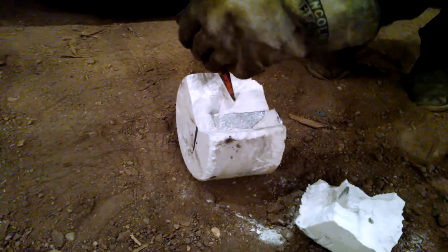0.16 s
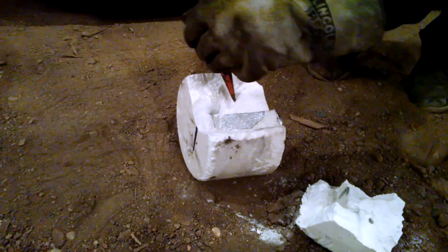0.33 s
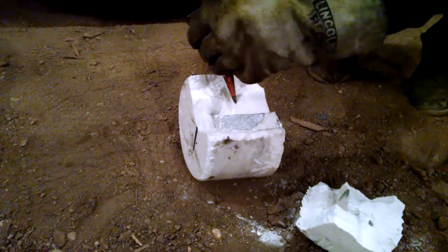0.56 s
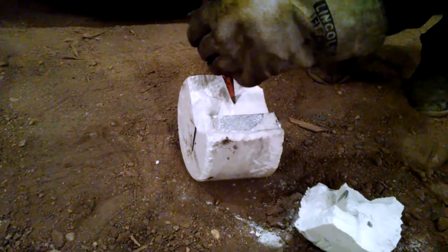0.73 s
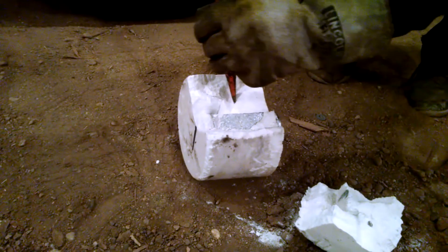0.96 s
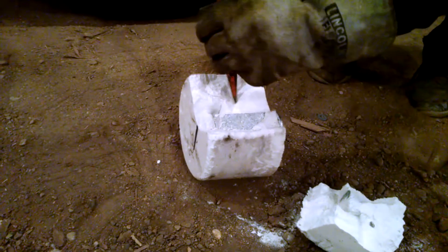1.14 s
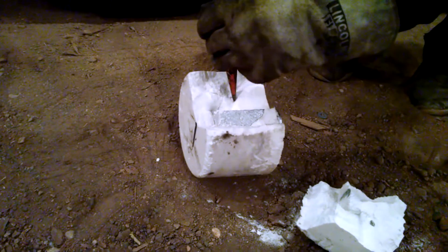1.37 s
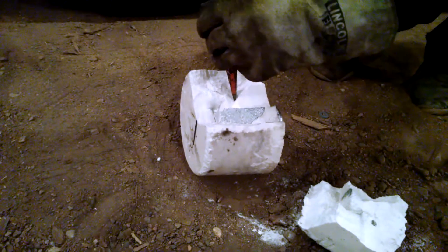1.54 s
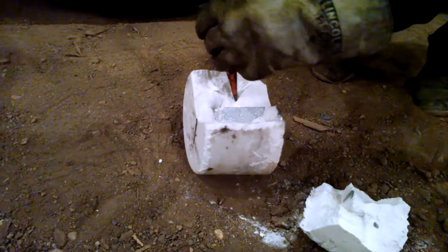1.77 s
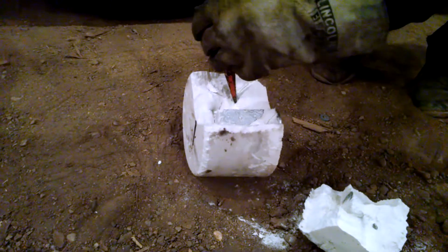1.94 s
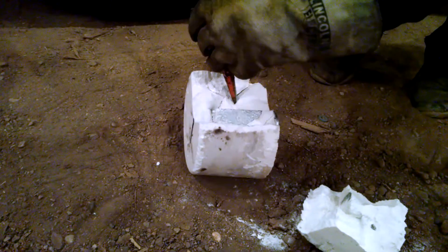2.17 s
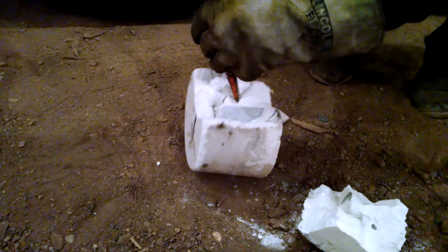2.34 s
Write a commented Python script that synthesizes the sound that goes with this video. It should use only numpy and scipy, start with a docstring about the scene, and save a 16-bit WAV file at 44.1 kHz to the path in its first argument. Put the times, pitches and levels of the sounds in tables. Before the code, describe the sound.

Hammer blows on a steel chisel crack a plaster mould, bright metallic clanks echoing in a hard room

```python
"""In a hard-walled room a hammer drives a steel chisel into a plaster mould around a metal casting.
Seven blows fall, about three a second: noise bursts crack the plaster, damped sines make chisel, mould and casting.
As the plaster loosens, the casting clanks more; some blows leave thin tones in the steel.
Floor and walls answer each blow, low pushes overload the close microphone, and one chip lands at the end.
Faint steady noise lies beneath."""
import sys
import numpy as np
from scipy import signal
from scipy.fft import rfft, irfft, next_fast_len
from scipy.io import wavfile

SR = 44100
rng = np.random.default_rng(int(sys.argv[2]) if len(sys.argv) > 2 else 0)


def store_pcm(level_fs):
    """Save levels as 16-bit WAV."""
    pcm = np.round(np.clip(level_fs, -1, 1) * 32767).astype(np.int16)
    wavfile.write(sys.argv[1], SR, np.atleast_2d(pcm).T)


N = 105840
T = np.arange(SR // 6) / SR  # s within one blow


def amp(db):
    """Amplitude factor of a level in dB."""
    return 10 ** (np.asarray(db) / 20)


def unit(x):
    """Scale to an RMS of one."""
    return x / np.sqrt(np.mean(x ** 2) + 1e-20)


def along(points, hz):
    """Interpolate (Hz, value) points on a log frequency axis."""
    f, v = np.transpose(points)
    return np.interp(np.log(hz + 1), np.log(f + 1), v)


def tilted(points, hz, tilt_db_per_octave):
    """Gain of a dB spectrum tipped about 2.9 kHz, less steeply in the bass."""
    return amp(along(points, hz) + tilt_db_per_octave * np.log2((hz + 100) / 3000))


def fade(t, t60):
    """Exponential decay, 60 dB in t60 seconds."""
    return amp(-60 * t / t60)


def add(out, s, x):
    """Mix x into out from s seconds on."""
    part = out[..., round(s * SR):][..., :x.shape[-1]]
    part += x[..., :part.shape[-1]]


def filtered(x, response):
    """Multiply the spectrum of x by a complex response of frequency."""
    n = x.shape[-1]
    m = next_fast_len(n + 1024, True)
    return irfft(rfft(x, m) * response(np.fft.rfftfreq(m, 1 / SR)), m)[..., :n]


CONTACT_S = 0.00056  # rise time constant


def ring(t, modes):
    """Damped sines (Hz, dB, T60 in s) that rise over the contact."""
    sines = sum(amp(db) * fade(t, t60) * np.sin(2 * np.pi * hz * t) for hz, db, t60 in modes)
    return (1 - np.exp(-t / CONTACT_S)) * sines


# Left-right likeness of sound from all sides. Each row: frequency in Hz, correlation from -1 to 1.
ROOM_LIKENESS = [(100, -0.7), (600, 0.81), (1500, 0.6), (3600, 0.11), (5100, -0.12), (7000, 0.016),
                 (10000, -.1)]


def diffuse(size):
    """Sound from all sides: noise whose mid and side shares set the left-right likeness."""
    def mid_side_gains(hz):
        angle = np.arccos(np.clip(along(ROOM_LIKENESS, hz), -1, 1)) / 2
        return np.array([np.cos(angle), np.sin(angle)])

    mid, side = filtered(rng.standard_normal((2, size)), mid_side_gains)
    return np.array([mid + side, mid - side])


BACKGROUND_DB = -65.5
# Steady background noise as picked up, with a dip near 2.5 kHz.
# Each row: frequency in Hz, relative density in dB per Hz.
BACKGROUND_SPECTRUM = [(25, -8), (65, -3), (110, -3.5), (200, -11.5), (600, -11), (1900, -14), (2550, -30),
                       (3100, -15), (3700, -10.5), (5000, -19), (9000, -20.5), (15000, -24)]


def background():
    """Steady diffuse noise, coloured by the background spectrum."""
    noise = filtered(diffuse(N), lambda hz: amp(along(BACKGROUND_SPECTRUM, hz)))
    return amp(BACKGROUND_DB) * unit(noise)


ROOM_RISE_S = 0.005
ROOM_UNEVEN_DB = 2.5  # the room favours some frequencies by chance
WALL_S, WALL_DB, WALL_T60_S = 0.032, -3, 0.062  # nearest wall, level over the reverberation
# Reverberation time. Each row: frequency in Hz, T60 in seconds.
ROOM_T60_S = [(150, 0.27), (500, 1.3), (1800, 1.4), (3600, 1.04), (7000, 0.67), (11000, .45), (15000, .35)]


def room(colour):
    """Answer to a burst of this colour: diffuse noise swells at a near wall and decays at each band's T60."""
    hz, t, z = signal.stft(diffuse(SR), SR, nperseg=512)
    decay = fade(t, along(ROOM_T60_S, hz)[:, None]) * (1 - np.exp(-t / ROOM_RISE_S))
    decay += amp(WALL_DB) * fade(np.abs(t - WALL_S), WALL_T60_S)
    uneven = amp(ROOM_UNEVEN_DB * rng.standard_normal(len(hz)))
    even_energy = np.sqrt(SR * np.mean(decay ** 2, axis=1, keepdims=True))
    decay *= (uneven * colour(hz))[:, None] / even_energy
    return signal.istft(z * decay, SR, nperseg=512)[1]


FLOOR_S, FLOOR_GAIN = 0.00355, 0.23
# Phase between the two microphone ports. Each row: frequency in Hz, left lead in radians.
PORT_LEAD_RAD = [(300, 0), (1000, -.45), (2000, -.6), (3800, -.8), (5100, -2.7), (6900, -5.4),
                 (11000, -8.4), (15000, -11)]


def port_phase(hz):
    """Split the phase lead evenly between the left and right ports."""
    return np.exp(1j * np.outer([.5, -.5], along(PORT_LEAD_RAD, hz)))


def arrive(x):
    """Direct sound and a delayed floor reflection at the two microphone ports."""
    def floor(hz):
        return 1 + FLOOR_GAIN * np.exp(-2j * np.pi * hz * FLOOR_S)

    return filtered(x, lambda hz: floor(hz) * port_phase(hz))


CHIP_S, CHIP_HZ, CHIP_DB, CHIP_T60_S = 2.291, 535, -40, 0.042


def chip():
    """A loose piece of plaster drops on the earth with a dull tap: one damped sine."""
    out = np.zeros(N)
    add(out, CHIP_S, ring(T, [(CHIP_HZ, CHIP_DB, CHIP_T60_S)]))
    return out


THUMP_PEAK_S, THUMP_LAG_S = 0.002, 0.00015  # left lags right
THUMP_SAG, THUMP_SAG_S = 0.046, 0.033  # opposite offset, slow recovery
# Microphone overloads. Each row: start in seconds, level in dB, swing in Hz.
OVERLOAD_PUSHES = [(0.233, -15.5, 45), (0.5614, -15, 40), (1.5072, -6.5, 190), (1.8138, -18.5, 29.85),
                   (2.1073, -10, 45)]


def thumps():
    """Hard blows overload the microphone: one low push and sag, nearly opposite in the two channels."""
    out, u = np.zeros((2, N)), T / THUMP_PEAK_S
    sag = THUMP_SAG * (1 - np.exp(-u)) * np.exp(-T / THUMP_SAG_S)
    for s, db, swing_hz in OVERLOAD_PUSHES:
        swing = np.cos(2 * np.pi * swing_hz * (T - THUMP_PEAK_S / 2))
        push = amp(db) * ((u * np.exp(1 - u)) ** 2 * swing - sag)
        add(out[0], s + THUMP_LAG_S, -push)
        add(out[1], s, push)
    return out


WAVER_DB, WAVER_PER_S = 3, 70  # standard deviation, knots per second
# Steel left ringing by a blow. Each row: start in seconds, frequency in Hz, level in dB, T60 in seconds.
STEEL_RINGS = [(0.2320, 6664, -33, 0.49), (0.2320, 3768, -39, 0.67), (0.231, 3810, -35.5, 0.6),
               (0.2320, 6690, -34.5, 0.38), (0.231, 11230, -41.5, .25), (0.5625, 11300, -42, .25),
               (0.9458, 3906, -53, 0.66), (0.5614, 6330, -65, .6), (1.2220, 3360, -42.5, 0.58),
               (1.8125, 3360, -43, 0.54), (1.223, 7103, -53, 0.39), (1.5077, 6290, -33.5, 0.63),
               (1.5084, 7150, -38.5, 0.43), (1.814, 7103, -30, 0.37), (1.8127, 6310, -38.5, 0.41),
               (1.8138, 11262, -11.5, .05), (1.8134, 11280, -39.5, 0.32), (2.11, 7103, -30.5, 0.43)]


def steel():
    """Thin, long damped sines in the metal, whose levels waver per channel in the room's echoes."""
    out, t = np.zeros((2, N)), np.arange(SR * 2 // 3) / SR
    for s, hz, db, t60 in STEEL_RINGS:
        knots = rng.standard_normal((2, 64))
        waver_db = [WAVER_DB * np.interp(t * WAVER_PER_S, np.arange(64), k) for k in knots]
        add(out, s, ring(t, [(hz, db, t60)]) * amp(waver_db))
    return filtered(out, port_phase)


# Plaster body. Each row: multiple of the knock pitch, relative level in dB, T60 in seconds.
MOULD_MODES = [(0.351, -12.5, 0.018), (1, -0.5, .010)]


def mould(knock_hz, knock_db):
    """The plaster body knocks: short damped sines at multiples of the knock pitch."""
    return ring(T, [(k * knock_hz, db + knock_db, t60) for k, db, t60 in MOULD_MODES])


# Casting, damped by its plaster jacket. Each row: frequency in Hz, relative level in dB, T60 in seconds.
CASTING_MODES = [(3095, -15.5, .035), (3366, -14.5, .04), (3827, -19.5, .03), (4228, -8.5, 0.034),
                 (4910, -6, 0.021), (5020, -5.5, 0.05), (6324, -9.5, .04), (7385, -17.5, 0.039),
                 (7450, -6.5, 0.037), (11250, -28.5, .04), (14000, -26.5, .02)]


def casting(clank_db, tilt_db_per_octave, pivot_hz):
    """The metal clanks: fixed damped modes, tipped about the chisel pitch."""
    modes = [(f, db + clank_db + tilt_db_per_octave * np.log2(f / pivot_hz), t60)
             for f, db, t60 in CASTING_MODES]
    return ring(T, modes)


CHISEL_T60_S = 0.026  # the gloved hand damps it
# Chisel overtones. Each row: frequency in Hz, relative level in dB, T60 in seconds.
CHISEL_OVERTONES = [(3684, -14, .04), (6722, -11.5, 0.039), (10250, -18.5, 0.028), (11230, -23.5, 0.041),
                    (15600, -24.5, .025)]


def chisel(hz, clack_db, overtones_db):
    """The struck steel clacks: a damped sine at its pitch plus fixed overtones."""
    return ring(T, [(hz, clack_db, CHISEL_T60_S)]) + amp(overtones_db) * ring(T, CHISEL_OVERTONES)


CRACK_T60_S, SCATTER_DB = 0.031, -7  # scatter: share of the crack arriving from all sides
CRUMBLE_DB, CRUMBLE_T60_S, CRUMBS_PER_S = -22.5, 0.11, 1500  # dust and crumbs
# Breaking plaster as picked up. Each row: frequency in Hz, relative density in dB per Hz.
CRACK_SPECTRUM = [(100, -15), (300, -9), (520, 1.5), (780, -4), (1150, -0.5), (1900, 3.5), (2550, -13),
                  (3200, 7), (4200, 6), (5600, -3.5), (7400, -5), (8700, -18), (11000, -3.5), (13500, -27),
                  (15000, -11.5), (16500, -26)]


def plaster(tilt_db_per_octave):
    """Breaking plaster: a noise burst with a faint spray of random impulses, both in the crack's colour."""
    def colour(hz):
        return tilted(CRACK_SPECTRUM, hz, tilt_db_per_octave)

    direct = arrive(rng.standard_normal(len(T)))
    crack = unit(filtered(direct + amp(SCATTER_DB) * diffuse(len(T)), colour))
    impulses = rng.standard_normal(len(T)) * (rng.random(len(T)) < CRUMBS_PER_S / SR)
    crumbs = unit(filtered(arrive(impulses), colour))
    return crack * fade(T, CRACK_T60_S) + amp(CRUMBLE_DB) * crumbs * fade(T, CRUMBLE_T60_S)


SPILL_DB, CHISEL_WET_DB, CHISEL_WIDTH_HZ = 0.5, 6, 780  # the room also holds the chisel's pitch
# Colour of the room's answer as the microphone picks it up, with dips near 2.5 and 8.4 kHz.
# Each row: frequency in Hz, relative level in dB.
ROOM_ANSWER_SPECTRUM = [(100, -15.5), (250, -12.5), (480, 3.5), (750, -2.5), (1150, -3.5), (1500, 0),
                        (1900, 0.5), (2250, -5.5), (2550, -23.5), (2850, -5), (3300, 10), (4100, 3),
                        (4550, -6), (5050, 0), (5700, -7.5), (6400, 2), (7500, -0.5), (8400, -26),
                        (10200, -9.5), (11300, -13.5), (13200, -25.5), (14800, -14.5), (16500, -28)]


def blow_in_room(hz, clack_db, spill_db, spill_tilt_db):
    """The room answers the blow with its broad colour and a resonant peak at the chisel pitch."""
    def colour(f):
        broad = amp(SPILL_DB + spill_db) * tilted(ROOM_ANSWER_SPECTRUM, f, spill_tilt_db)
        pitched = amp(clack_db + CHISEL_WET_DB) / (1 + (2 * (f - hz) / CHISEL_WIDTH_HZ) ** 2)
        return np.hypot(broad, pitched)

    return room(colour)


# Hammer blows. Each row: start in seconds, chisel pitch in Hz, chisel clack in dB, chisel overtones in dB,
# plaster crack in dB, crack tilt in dB per octave, mould knock in Hz, knock in dB, casting clank in dB,
# clank tilt in dB per octave, left minus right in dB, spill into the room in dB, spill tilt in dB per octave.
HAMMER_BLOWS = [(0.2320, 3798, 4, 1, -7, -1, 1043, -16.5, -9, -16, 0, -4, 1.14),
                (0.5613, 3540, 0.5, -14, -10.5, 0.5, 1520, -9.5, -8.5, -5.5, 0, -4, -.5),
                (0.9456, 3907, -9, -20, -23, 0.9, 1393, -22.5, -21.5, -18.5, -1, -13.5, -2.5),
                (1.2220, 4005, 0, -10, -7, 2, 1450, -8.5, -6, -3.5, -2, -1, 0),
                (1.5077, 3888, -2.5, -11, -8.5, 0, 1244, -6.5, -8, 8.5, 1, 0, 0.57),
                (1.8127, 3975, -11, -4.5, -8, 0.5, 1150, -17.5, -3.5, -8, -1.5, 1, -0.5),
                (2.1084, 4024, -9, -9.5, -8, 1, 1067, -4.5, -4, -1.5, -1, 2, 0.2)]


def blows():
    """Each blow sounds chisel, mould, casting and plaster at once, and washes through the room."""
    out = np.zeros((2, N))
    for (s, hz, clack_db, overtones_db, crack_db, crack_tilt_db, knock_hz, knock_db,
         clank_db, clank_tilt_db, pan_db, spill_db, spill_tilt_db) in HAMMER_BLOWS:
        struck = chisel(hz, clack_db, overtones_db) + casting(clank_db, clank_tilt_db, hz)
        struck += mould(knock_hz, knock_db)
        near = arrive(struck) + amp(crack_db) * plaster(crack_tilt_db)
        add(out, s, near * amp(pan_db * np.array([[.5], [-.5]])))
        add(out, s, blow_in_room(hz, clack_db, spill_db, spill_tilt_db))
    return out


# Stereo balance of the work. Each row: frequency in Hz, left minus right in dB.
WORK_BALANCE_DB = [(100, -3), (600, -2), (1400, -.5), (3700, -3.5), (5200, -2.5), (7200, -6), (11000, -7),
                   (15000, -2.5)]


def scene():
    """The work is heard a little to the right, over steady background noise."""
    work = blows() + steel() + chip() + thumps()
    placed = filtered(work, lambda hz: amp(np.outer([.5, -.5], along(WORK_BALANCE_DB, hz))))
    return placed + background()


CLIP_KNEE, TOP_HZ = 9.6, 15600  # knee exponent (higher is harder), band limit


def record(dry):
    """Peaks saturate at full scale; the response then falls steeply above the band limit."""
    clipped = dry / (1 + np.abs(dry) ** CLIP_KNEE) ** (1 / CLIP_KNEE)
    return filtered(clipped, lambda hz: 1 / np.sqrt(1 + (hz / TOP_HZ) ** 120))


dry = scene()
out = record(dry)
store_pcm(out)
```